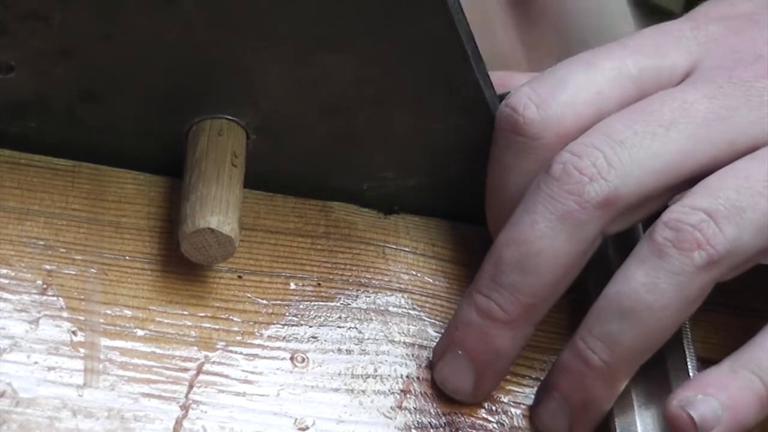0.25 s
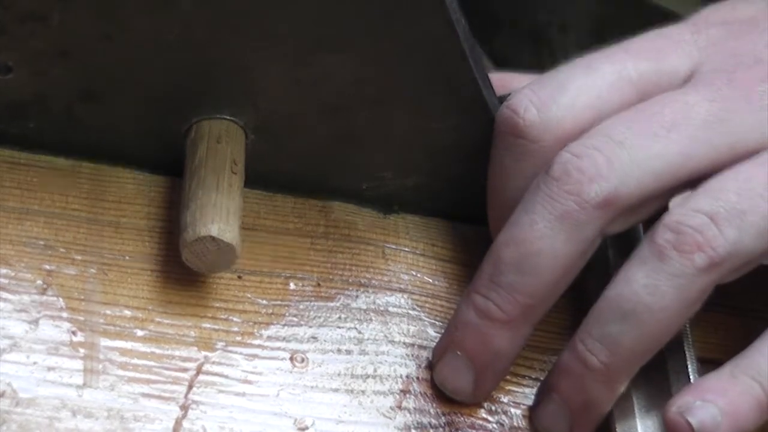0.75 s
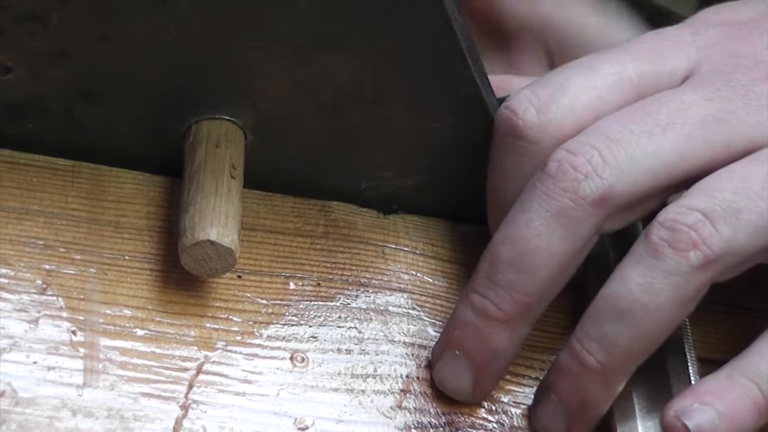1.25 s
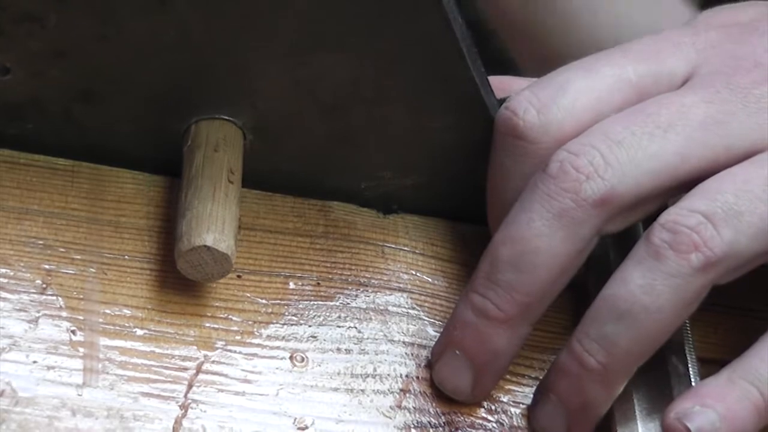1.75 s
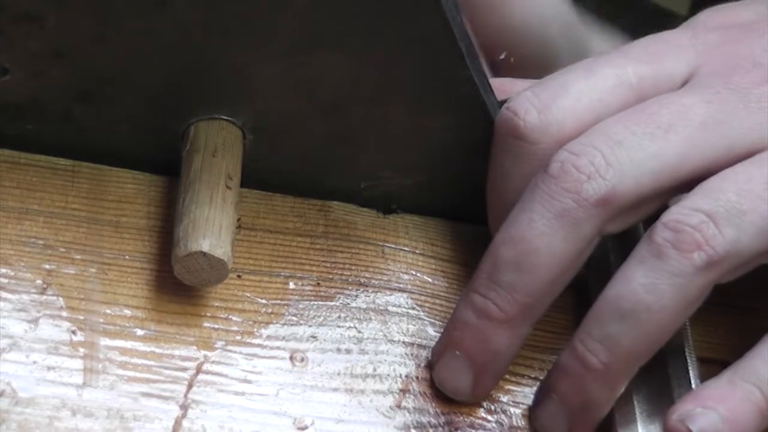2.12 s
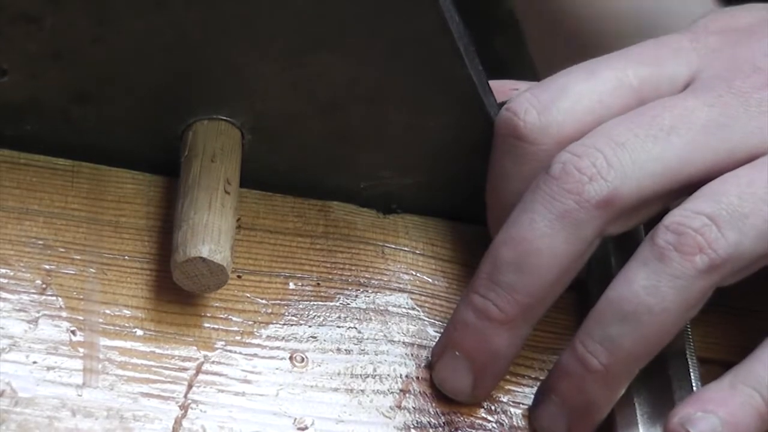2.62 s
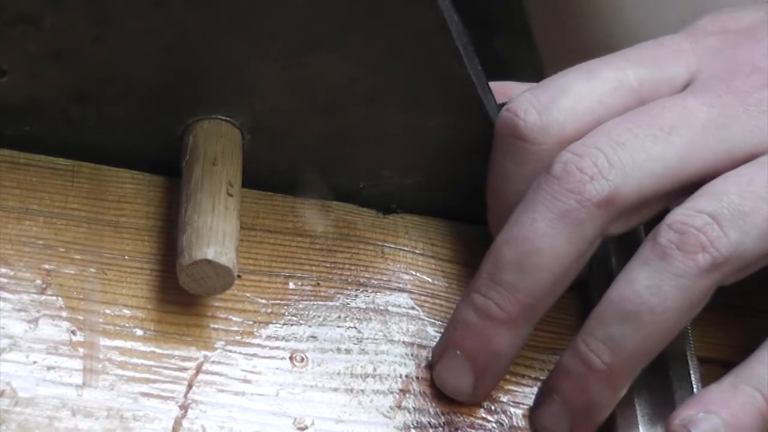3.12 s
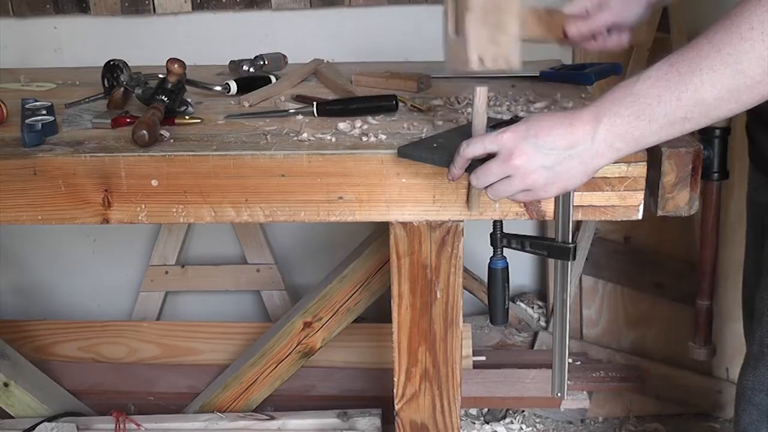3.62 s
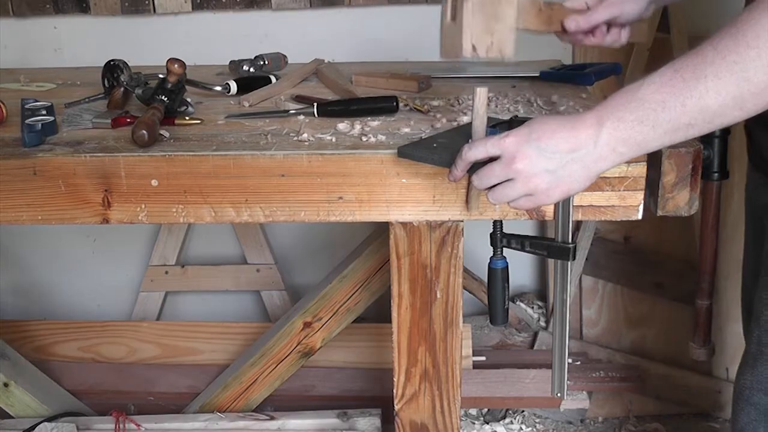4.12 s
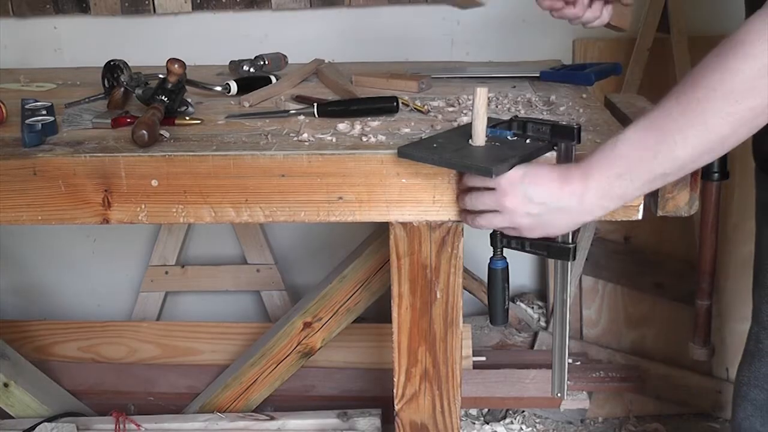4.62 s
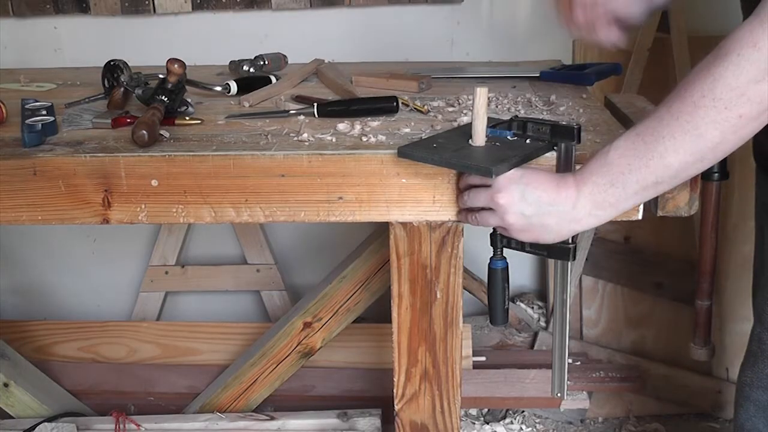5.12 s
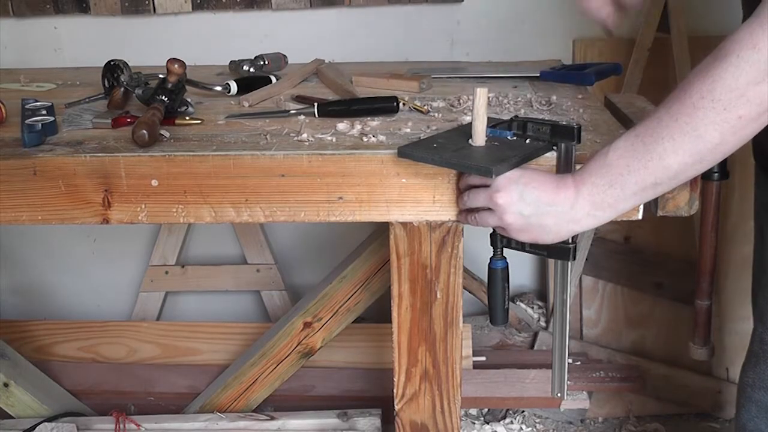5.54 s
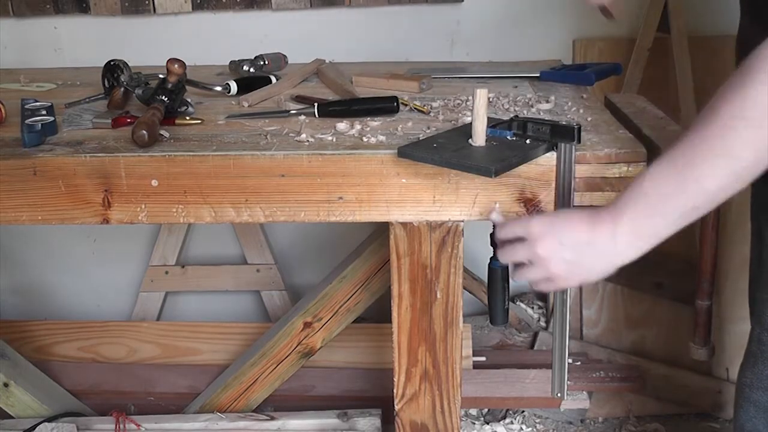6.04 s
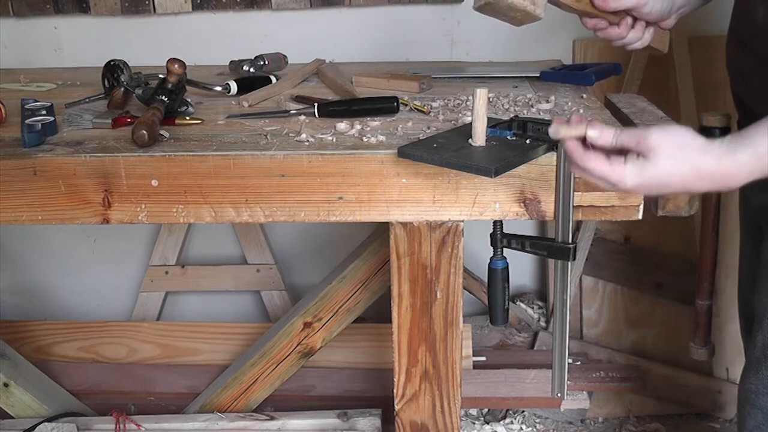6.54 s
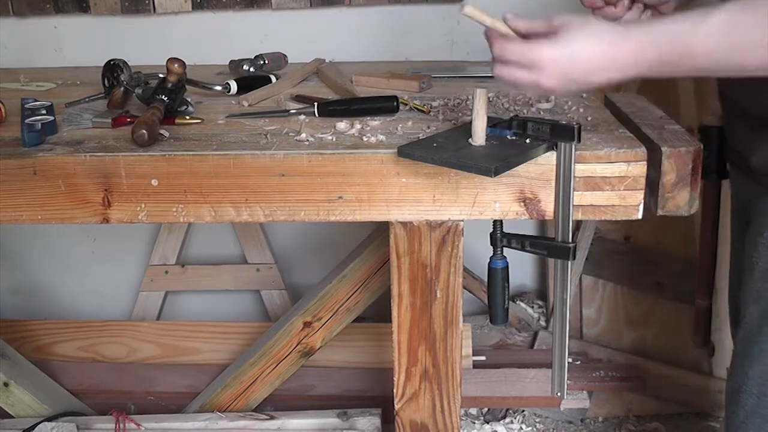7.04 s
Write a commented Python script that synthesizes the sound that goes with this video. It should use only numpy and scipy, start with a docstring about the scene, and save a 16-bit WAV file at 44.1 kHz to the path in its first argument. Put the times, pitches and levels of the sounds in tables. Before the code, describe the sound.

A wooden mallet drives a dowel through a hole in a steel plate clamped to a workbench. Eight close, evenly spaced blows land, each a sharp woody crack with a brief high ping and short room reverberation. The microphone abruptly shifts across the bench for four hollower blows in two pairs, with faint steel ringing. Small handling rubs come between them, and a soft background hiss swells in the pauses.

```python
"""A wooden mallet drives a dowel through a hole in a steel plate clamped to a bench in a small workshop.
Each impact is a broadband crack that excites the free vibration of dowel, plate and room, followed by
reverberation. Eight blows are heard from close by, then, after an abrupt change of position, four
from across the bench, with small handling noises between. An automatic gain control ducks at each
blow and lets the room's steady rush swell back in the pauses."""
import sys
import numpy as np
from scipy import signal
from scipy.fft import rfft, irfft
from scipy.io import wavfile
from scipy.ndimage import uniform_filter1d, minimum_filter1d

SR = 44100
rng = np.random.default_rng(int(sys.argv[2]) if len(sys.argv) > 2 else 0)


def digitize_waveform(pressure):
    """Quantize a signal to 16-bit integers and store it at the path in sys.argv[1].

    Rows of a 2-D input are taken as channels; values are limited to [-1, 1].
    """
    field = np.atleast_2d(pressure).T
    bounded = np.clip(field, -1, 1)
    quanta = np.round(bounded * 32767).astype(np.int16)
    wavfile.write(sys.argv[1], SR, quanta)


N = 320607
TIME = np.arange(N) / SR
AGE = TIME[:int(.8 * SR)]   # seconds since an impact
MOVE_S, CUTOFF_HZ = 3.479, 11850   # change of position; upper band limit
SIDE = np.array([[1], [-1]])   # opposite signs in left and right


def from_db(db):
    """Amplitude ratio of a level in decibels."""
    return 10 ** (np.asarray(db) / 20)


def rms_one(x):
    """Power normalisation to an rms of 1."""
    return x / np.sqrt(np.mean(x ** 2) + 1e-20)


def unit_hit(x):
    """Energy normalisation to that of 10 ms at rms 1."""
    return x / np.sqrt(np.sum(x ** 2) / (.01 * SR) + 1e-20)


def at_hz(points, hz):
    """Interpolation on a logarithmic frequency axis."""
    frequencies, values = np.array(points).T
    return np.interp(np.log(hz), np.log(frequencies), values)


def band(x, low, high):
    """Causal Butterworth band-pass, edges in Hz."""
    sos = signal.butter(2, [max(low, 15), min(high, .45 * SR)], "band", fs=SR, output="sos")
    return signal.sosfilt(sos, x + 1e-18)


def delayed(x, s):
    """Propagation delay of s seconds."""
    return np.interp(np.arange(len(x)) - round(s * SR), np.arange(len(x)), x, left=0, right=0)


def swell(rise_s, t60):
    """Exponential build-up and decay; the decay loses 60 dB in t60 seconds."""
    return (1 - np.exp(-AGE / max(rise_s, 1e-5))) * from_db(-60 * AGE / t60)


def burst(rise_s, t60):
    """White noise under an exponential build-up and decay."""
    return rng.standard_normal(len(AGE)) * swell(rise_s, t60)


def coloured(x, gain_db):
    """Minimum-phase filtering by a folded cepstrum, with one gain per FFT bin."""
    size = x.shape[-1]
    cepstrum = irfft(np.log(from_db(gain_db)), size)
    cepstrum[1:size // 2] *= 2
    cepstrum[size // 2 + 1:] = 0
    return irfft(rfft(x) * np.exp(rfft(cepstrum)), size)


def banded_noise(spectrum, width, envelope, count=32):
    """Incoherent sum of noise bands, each with its own level, stereo width and envelope(hz)."""
    edges = np.geomspace(175, 13150, count) - 150
    out = 0
    for low, high in zip(edges, edges[1:]):
        hz = np.sqrt(low * high)
        shape = envelope(hz)
        mid, side = (rms_one(band(rng.standard_normal(len(shape)) * shape, low, high)) for _ in "ms")
        stereo = mid + from_db(at_hz(width, hz)) * side * SIDE
        out = out + from_db(at_hz(spectrum, hz)) * np.sqrt(high - low) * stereo
    return out


# Ambient spectra. Each row: frequency in Hz, relative spectral density in dB.
NEAR_RUSH = [(15, -57), (25, -34), (101, -26), (145, -5), (208, -7.5), (488, -11.5), (631, -13),
             (700, -14.5), (817, -21), (1170, -22), (1300, -14), (1480, -20), (10300, -43.5),
             (12000, -52.5), (15600, -85), (22000, -120)]
FAR_RUSH = [(15, -42), (25, -10.5), (48, -9), (91, 1), (124, -2), (298, -0.5), (418, -7.5), (513, -4),
            (797, -2), (1140, -6), (1600, -10.5), (2480, -16), (5120, -20), (9510, -28.5), (12000, -34),
            (15600, -65), (22000, -120)]
# Their stereo width. Each row: frequency in Hz, side minus mid level in dB.
NEAR_RUSH_WIDTH = [(60, 2), (150, -7.5), (300, -14), (600, -20.5), (1200, -17), (2400, -26), (5000, -25.5)]
FAR_RUSH_WIDTH = [(60, -9.5), (110, -15.5), (200, -15), (350, -11.5), (640, -11.5), (1160, -8), (2090, -13),
                  (3770, -46.5), (6820, -45.5), (12300, -19)]

def rush(spectrum, width):
    """Stationary broadband noise forms the workshop's background."""
    return rms_one(banded_noise(spectrum, width, lambda hz: np.ones(N), count=24))


# Faint steady tones. Each row: frequency in Hz, level in dB.
NEAR_HUM = [(156, -50.5), (705, -48.5), (1453, -55), (2616, -64)]
FAR_HUM = [(97, -56.5), (780, -58), (1034, -66.5), (2584, -70.5)]

def hum(tones):
    """Narrow-band noise is heard as a tone that wavers slightly."""
    return sum(from_db(db) * rms_one(band(rng.standard_normal(N), hz - 3, hz + 3)) for hz, db in tones)


# Ticks and rubs of the work in hand.
# Each row: start in seconds, centre in Hz, bandwidth in Hz, length in seconds, level in dB.
RUBS = [(0.226, 8060, 6000, .008, -56), (0.515, 5300, 3000, 0.079, -32), (1.063, 9000, 2500, 0.0057, -46),
        (4.06, 886, 1400, 0.011, -53), (4.445, 6040, 350, 0.066, -50.5), (4.67, 6100, 450, .03, -53),
        (4.69, 2700, 220, 0.24, -51.5), (4.744, 6000, 8000, 0.011, -49), (4.933, 2950, 886, 0.12, -46),
        (5.965, 8100, 6100, .01, -61), (6.308, 6220, 1200, 0.092, -51.5)]

def handling(slips_per_s=2500):
    """Friction: random slips excite one damped resonance, quick to start and slower to end."""
    out = np.zeros(N)
    for s, hz, width_hz, length_s, db in RUBS:
        stroke = np.sin(np.pi * np.sqrt(np.clip((TIME - s) / length_s, 0, 1)))
        slips = rng.standard_normal(N) * (rng.random(N) < slips_per_s / SR)
        resonance = signal.iirpeak(hz, hz / width_hz, fs=SR)
        out += from_db(db) * stroke * rms_one(signal.lfilter(*resonance, slips + 1e-18))
    return out


# Reverberant spectra. Each row: frequency in Hz, relative spectral density in dB.
NEAR_ROOM = [(40, -30.5), (60, -29), (88, -6), (200, -14), (330, 5), (650, 1.5), (1100, -4), (2000, -4.5),
             (2700, -12), (4100, -8.5), (6500, -11.5), (8000, -14.5), (10000, -15), (12000, -33.5)]
FAR_ROOM = [(40, -32.5), (120, -13.5), (175, -2.5), (350, 0), (600, 2.5), (1100, -5), (1900, -7),
            (2600, -16), (3700, -7.5), (6000, -12), (8000, -23), (12000, -30.5)]
# Decay of the room. Each row: frequency in Hz, reverberation time in seconds.
REVERB_T60 = [(60, 0.62), (150, 0.38), (450, 0.38), (1500, 0.37), (4000, 0.35), (7000, 0.31), (11000, .26)]
# Its stereo width. Each row: frequency in Hz, side minus mid level in dB.
REVERB_WIDTH = [(60, -4.5), (150, -15), (300, -14.5), (600, -8.5), (1200, -8), (2400, -15), (4500, -40),
                (9000, -33.5)]

def reverberation(spectrum, rise_s):
    """A diffuse field: reflections thicken, soonest in the treble, then decay band by band."""
    def envelope(hz):
        return swell(rise_s * min(1, 700 / hz) ** 0.86, at_hz(REVERB_T60, hz))
    return unit_hit(banded_noise(spectrum, REVERB_WIDTH, envelope))


# Modes of the steel. Each row: frequency in Hz, level in dB for a 0 dB blow, 60 dB decay in seconds.
STEEL_MODES = [(1367, -38, 0.88), (1470, -48.5, 1.3)]

def singing_steel(blows):
    """Lightly damped modes outlast the room; each blow adds to their stored energy."""
    out = np.zeros(N)
    for hz, db, t60 in STEEL_MODES:
        energy = sum((TIME >= s) * from_db(force_db - 60 * np.maximum(TIME - s, 0) / t60) ** 2
                     for s, force_db, *_ in blows)
        out += from_db(db) * np.sqrt(energy) * np.sin(2 * np.pi * hz * TIME)
    return out


# Low resonances of the room and high ringing of plate and dowel.
# Each row: frequency in Hz, relative level in dB.
NEAR_MODES = [(250.3, -5.5), (321.7, -0.3), (375.5, -9.5), (395.7, -7), (414.5, -13), (458.9, -4),
              (492.6, -12.5), (508.7, -4.5), (532.9, -6.5), (554.5, -16.5), (625.8, -2.5), (659.5, -10),
              (683.7, -8.5), (736.2, -14), (823.6, -9), (860.0, -9), (908.4, -5), (935.3, -8),
              (979.8, -6.5), (1528.9, -17), (1557.1, -20.5), (1602.9, -11), (3694.3, -13), (3838.3, -12),
              (4075.2, -9.5), (4110.2, -4.5), (4134.4, -8), (4162.6, -7)]
FAR_MODES = [(261.1, 6.5), (354.0, 6.5), (375.5, 5.5), (405.1, 8), (475.1, -22.5), (511.4, 8.5), (527.6, 7),
             (549.1, -11), (572.0, 3.5), (624.5, 7.5), (644.7, -0.5), (681.0, -39.5), (710.6, -20.5),
             (729.4, -15), (753.7, 1.5), (901.7, -13), (960.9, -17.5), (998.6, 2.5), (1183.0, -6.5),
             (1779.2, -14.5), (3546.2, -35), (3563.7, -4.5), (3593.4, -36), (3618.9, -3.5), (4088.6, -25.5),
             (4122.3, 4.5), (4209.7, -27.5), (4683.5, -31.5)]

def ringing(modes, rise_s, sustain):
    """Modal superposition: low room modes build slowly, plate and dowel fast; all fade with the room."""
    out = 0
    for hz, db in modes:
        phase = rng.random() + rng.normal(0, .025) * min(1, 1000 / hz) * SIDE   # in cycles
        scatter = np.cumsum(rng.standard_normal(len(AGE))) * 0.0025 * hz / 4000   # blur by reflections
        envelope = swell(rise_s * min(1, 600 / hz), sustain * at_hz(REVERB_T60, hz))
        out = out + from_db(db) * unit_hit(envelope * np.sin(2 * np.pi * (hz * AGE + phase + scatter)))
    return unit_hit(out)


def bench_thump(push_s, rock_db=-3.5):
    """A half-sine force pulse deflects the bench top; the jolt rocks the microphone sideways."""
    pulse = np.sin(np.pi * np.minimum(AGE / push_s, 1))
    push = unit_hit(band(pulse, 59, 350))
    rocking = unit_hit(band(burst(0, t60=0.033), 30, 300))
    return push + from_db(rock_db) * rocking * SIDE


def dowel_ping(hz, rise_s, t60, room_db, spread_hz=110):
    """Longitudinal resonance of the dowel, which the room scatters into a rough tail."""
    direct = unit_hit(swell(rise_s, t60) * np.sin(2 * np.pi * hz * AGE))
    scattered = band(burst(0.0041, at_hz(REVERB_T60, hz)), hz - spread_hz, hz + spread_hz)
    return direct + from_db(room_db) * unit_hit(scattered)


def snap(low_hz, t60):
    """The onset transient: the first instant of contact is a short, bright click."""
    return unit_hit(band(burst(0, t60), low_hz, CUTOFF_HZ))


# Contact spectra. Each row: frequency in Hz, relative spectral density in dB.
NEAR_CRACK = [(100, 0), (250, 6), (480, -3), (730, 4.5), (1150, -4.5), (1550, 2), (2300, -6), (4200, -1),
              (5500, -8), (7500, -8.5), (9000, -11.5), (12000, -29.5)]
FAR_CRACK = [(60, -15.5), (130, -2.5), (280, 6), (570, 4), (1050, 3.5), (1700, 0.5), (2500, -9.5),
             (4000, -1), (6100, 1.5), (7500, -15.5), (12000, -19)]
# Their stereo width. Each row: frequency in Hz, side minus mid level in dB.
CONTACT_WIDTH = [(70, -2), (280, -4), (600, -7.5), (1100, -11.5), (2200, -12.5), (4500, -21.5),
                 (9000, -21.5)]

def crack(spectrum, t60):
    """Impact noise: wood meets wood and fibres shear in the hole in one dense burst."""
    return unit_hit(banded_noise(spectrum, CONTACT_WIDTH, lambda hz: swell(.0001, t60), count=24))


def landing_db(hz, hardness_db, knock_db, hard_above_hz=7200, knock_hz=560, knock_octaves=1.7):
    """Contact stiffness sets the treble; a sticking dowel transmits a hollow knock to the bench."""
    treble = 1 / (1 + (hard_above_hz / hz) ** 23)
    knock = np.exp(-.5 * (np.log2(hz / knock_hz) / knock_octaves) ** 2)
    return hardness_db * treble + knock_db * knock


# Damped resonances of mallet and clamp. Each row: centre in Hz, bandwidth in Hz, relative lift in dB.
NEAR_PEAKS = [(1556, 50, 4), (2675, 110, 0.5), (3300, 118, 2.1), (3830, 268, 3.5), (4870, 200, 3),
              (6100, 296, 2), (6660, 350, 3.5), (6950, 300, 4), (7100, 174, 3), (7849, 136, 5),
              (8603, 430, 5.5), (9265, 300, 3.5), (10080, 270, 2), (10900, 154, 2)]
FAR_PEAKS = [(1900, 300, 0.56), (2950, 200, 0.66), (3520, 140, 4.6), (4780, 120, 4.1), (5250, 340, 2),
             (5860, 76, 1.4), (6210, 330, 4.7), (6760, 520, 3.7), (7440, 150, 3.0), (8250, 300, 2.6),
             (8650, 300, 4), (9700, 300, 2.6), (10200, 200, 3.5), (10578, 136, 2.1)]

def hammering(blows, peaks, shared, fresh):
    """Source and filter: resonances and landing colour a shared response plus each fresh contact."""
    out = np.zeros((2, N))
    hz = np.fft.rfftfreq(len(AGE), 1 / SR) + 1
    lift_db = sum(db / (1 + (2 * (hz - centre) / width) ** 4) for centre, width, db in peaks)
    lift_db -= uniform_filter1d(lift_db, size=1200)   # valleys between the resonances
    for s, force_db, ping_hz, ping_db, hardness_db, knock_db in blows:
        gain_db = force_db + lift_db + landing_db(hz, hardness_db, knock_db)
        blow = coloured(shared + fresh(ping_hz, ping_db), gain_db)
        start = round(s * SR)
        first, last = max(start, 0), min(start + len(AGE), N)
        out[:, first:last] += blow[:, first - start:last - start]
    return out


# Blows from across the bench. Each row: start in seconds, force in dB, ping frequency in Hz,
# then relative ping level, contact hardness and bench knock, all in dB.
FAR_BLOWS = [(3.6444, 5, 4020, 0, 3.2, -2.5), (4.092, 6.5, 6340, -7, -2, -2),
             (5.2016, -4, 5980, 1, 2.5, 4.5), (5.6354, -2, 4220, 3.5, 7.5, 1.5)]

def far_mallet():
    """With distance the reverberant field gains on the direct sound, and the crack is broader."""
    room = from_db(1.5) * reverberation(FAR_ROOM, rise_s=0.061)
    modes = from_db(2.5) * ringing(FAR_MODES, rise_s=0.031, sustain=0.98)
    shared = crack(FAR_CRACK, t60=0.08) + room + modes

    def fresh(ping_hz, ping_db):
        strike = from_db(-1) * crack(FAR_CRACK, t60=0.028) + from_db(-16) * snap(6400, t60=0.011)
        ping = from_db(ping_db - 12) * dowel_ping(ping_hz, rise_s=0.0012, t60=0.021, room_db=-0.5)
        bench = from_db(-20) * bench_thump(push_s=0.0028)
        return strike + ping + bench + from_db(-3) * reverberation(FAR_ROOM, rise_s=0.011)
    return hammering(FAR_BLOWS, FAR_PEAKS, shared, fresh)


# Blows from close by; the first leaves only its tail. Each row: start in seconds, force in dB,
# ping frequency in Hz, then relative ping level, contact hardness and bench knock, all in dB.
NEAR_BLOWS = [(-0.05, 2.5, 4070, -0.5, .5, 1.5), (0.3689, 3, 4100, 0.5, .8, 1.5),
              (0.7973, 3.5, 4060, 0, -2, 1.5), (1.2262, 4.5, 4120, 0, 1, 3),
              (1.6531, 1.5, 4113, -0.5, -2.5, 1), (2.0699, 5, 4073, 0.5, 0, 1),
              (2.4915, 7.5, 4107, 1, 1, 1), (2.9266, 10.5, 4090, 0, -4.5, -1.5),
              (3.3503, 4.8, 4086, 1.5, 1, 1.2)]

def near_mallet():
    """In the direct field the dowel's ping leads; reflection from one wall adds a dull echo."""
    contact = from_db(1.5) * crack(NEAR_CRACK, t60=.035)
    echo = from_db(-7.5) * delayed(band(contact[0], 150, 1500), .0435)
    room = from_db(2) * reverberation(NEAR_ROOM, rise_s=0.043)
    modes = from_db(2.5) * ringing(NEAR_MODES, rise_s=0.024, sustain=0.86)
    shared = contact + echo + room + modes

    def fresh(ping_hz, ping_db):
        strike = from_db(-7.5) * crack(NEAR_CRACK, t60=0.048) + from_db(-12) * snap(6000, t60=0.0056)
        ping = from_db(ping_db - 0.5) * dowel_ping(ping_hz, rise_s=.003, t60=0.023, room_db=-14)
        bench = from_db(-12.5) * bench_thump(push_s=0.0036)
        return strike + ping + bench + from_db(-1) * reverberation(NEAR_ROOM, rise_s=0.007)
    return hammering(NEAR_BLOWS, NEAR_PEAKS, shared, fresh)


def scene():
    """Superposition of the sources at the near position, then at the far one."""
    near = near_mallet() + from_db(-43) * rush(NEAR_RUSH, NEAR_RUSH_WIDTH) + hum(NEAR_HUM)
    lean_right = from_db(-.7 * SIDE)
    far = far_mallet() + from_db(-42.5) * rush(FAR_RUSH, FAR_RUSH_WIDTH) * lean_right + hum(FAR_HUM)
    far += singing_steel([NEAR_BLOWS[-1], *FAR_BLOWS])
    return np.where(TIME < MOVE_S, near, far) + handling()


def gain_control(x, start_duck_db, ceiling_db=-13.0, hold_s=0.21, release_db_per_s=17.0):
    """Limiting: gain drops once the level passes the ceiling, holds, then recovers at a steady rate."""
    power = uniform_filter1d(np.mean(x ** 2, axis=0), size=353)   # 8 ms average
    level_db = 10 * np.log10(np.maximum(power, 1e-12))
    over_db = np.maximum(level_db - ceiling_db, 0)
    over_db[0] = max(over_db[0], start_duck_db)   # the hammering is already under way
    half = int(hold_s * SR / 2)
    held_db = -minimum_filter1d(-over_db, 2 * half + 1, origin=half, mode="constant")
    recovery_db = release_db_per_s * TIME[:len(held_db)]
    duck_db = np.maximum.accumulate(held_db + recovery_db) - recovery_db
    return x * from_db(-uniform_filter1d(duck_db, size=45))


def record(dry):
    """Gain control starts afresh at each position; soft saturation and a steep low-pass follow."""
    near, far = np.split(dry, [round(MOVE_S * SR)], axis=1)
    levelled = np.hstack([gain_control(near, start_duck_db=17), gain_control(far, start_duck_db=12)])
    fade_in = np.minimum(TIME / .004, 1)
    rounded = 1.05 * np.tanh(levelled / 1.05) * fade_in
    return signal.sosfilt(signal.ellip(10, .2, 70, CUTOFF_HZ, fs=SR, output="sos"), rounded)


dry = scene()
out = record(dry)
digitize_waveform(out)
```